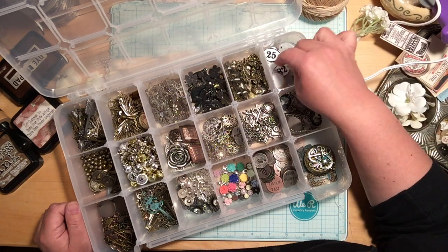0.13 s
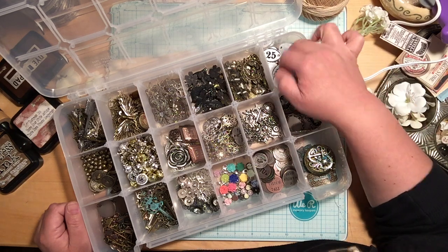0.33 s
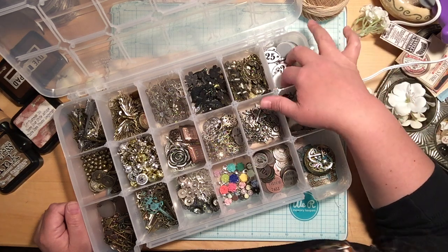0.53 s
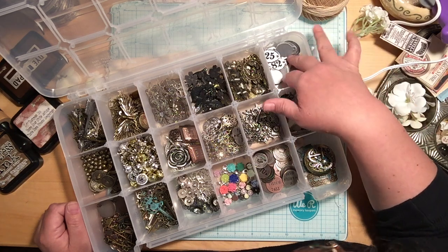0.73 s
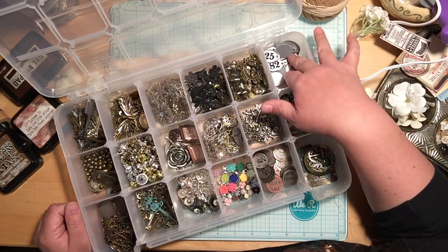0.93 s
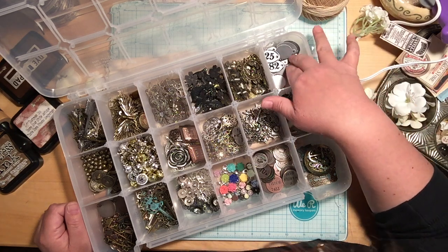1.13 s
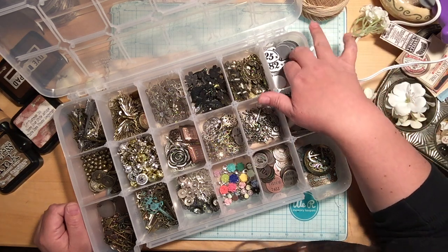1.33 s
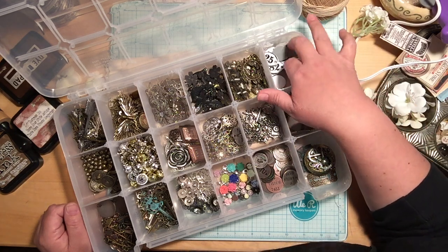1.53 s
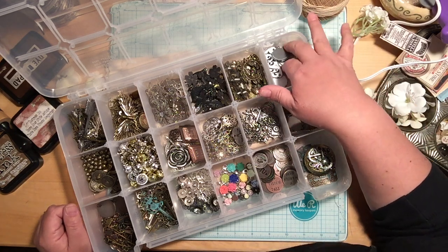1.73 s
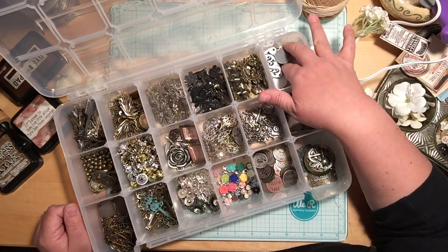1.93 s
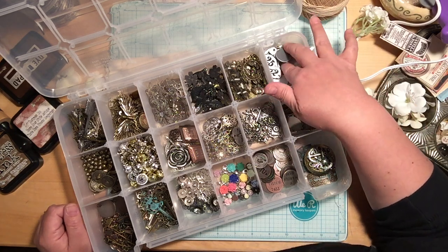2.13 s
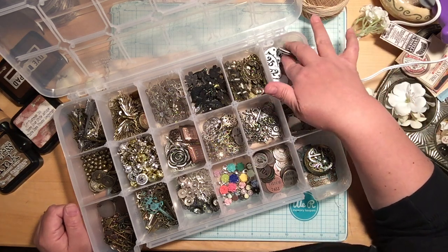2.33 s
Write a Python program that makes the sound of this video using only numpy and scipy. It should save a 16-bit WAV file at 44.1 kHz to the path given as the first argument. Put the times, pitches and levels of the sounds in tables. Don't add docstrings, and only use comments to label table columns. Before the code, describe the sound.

Metal tags rattle under a finger in a plastic compartment, loud at first, then lightly ticking

```python
import sys
import numpy as np
from scipy import signal
from scipy.fft import rfft, irfft, next_fast_len
from scipy.io import wavfile
from scipy.ndimage import map_coordinates

SR = 44100
rng = np.random.default_rng(int(sys.argv[2]) if len(sys.argv) > 2 else 0)


def voltage_ratio(decibels):
    exponent = np.asarray(decibels, float) / 20
    return 10 ** exponent


def master_out(mix):
    frames = np.transpose(np.atleast_2d(mix))
    ceiling = np.clip(frames, -1, 1)
    pcm = np.round(ceiling * 32767).astype(np.int16)
    wavfile.write(sys.argv[1], SR, pcm)


N = 105531

TAG_PARTIALS = [11960, 12085, 12770, 13245, 13640, 14970, 15495]
# (frequency [Hz], level [dB], T60 [s])
TRAY_MODES = [(678, -10.5, 0.052), (1010, -5, 0.051), (1104, 1, 0.027), (1280, 3, 0.016),
              (1489, 5.5, 0.019)]


def contacts(clack, tick):
    # (time [s], clack peak level [dB],
    # tray knock level re clack [dB], metal tick level re clack [dB])
    tag_contacts = [(0.0893, -44.5, 10, -31), (0.1351, 0, -10.5, -18), (0.156, -18.5, -35, 4),
                    (0.163, -7.5, -11, 4), (0.1689, -13, -8, 4.5), (0.1738, -10, -7, -2.5),
                    (0.187, -12, -39, 1.5), (0.1967, -17, -10, -4), (0.2041, -13, -17, 6.5),
                    (0.2257, -23.5, -6.0, 6), (0.2411, -19.5, -21, 4.5), (0.258, -25, 3, 8),
                    (0.3426, -30, -6.5, 2), (0.402, -46, 8.5, -22), (0.498, -14, -30, -8.5),
                    (0.5031, -10, -16, -3), (0.5283, -14, -5, -2), (0.5695, -21, -13, -14.5),
                    (0.5869, -32.5, -16, 16), (0.5946, -15.5, -24, -9.5), (0.602, -20.5, -32, -1.5),
                    (0.638, -21.5, -13, -5), (0.6854, -22, -13.5, 0), (0.7176, -39, 3.5, 10.5),
                    (0.781, -51, 0, 7),
                    (0.821, -29.5, -11, -35), (0.845, -34.5, -9, -14.5), (0.9243, -42, -9, -24),
              (0.9745, -42, -23, -24), (1.0846, -20.5, -4.5, -30), (1.104, -26.5, 0.5, -28),
              (1.131, -32.5, -12, -19), (1.2804, -20, -13, -3.5), (1.3207, -43.5, -23.5, 20.5),
              (1.424, -23, -7.5, -4), (1.4412, -27, -7, -8), (1.462, -20.5, -3, -21),
              (1.506, -25, -7.5, -15), (1.5667, -59, -11, 18), (1.5819, -16, -22, 0.5),
              (1.6357, -25, -21, 4.5),
                    (1.6685, -35, -26, -10), (1.683, -26, -22, -23), (1.705, -34, 3, -12),
               (1.7181, -18.5, -15, -13), (1.74, -23, -8, 3.5), (1.7501, -23.5, -8, 4.5),
               (1.769, -29, -12, 1.5), (1.7853, -22.5, -12.5, -21), (1.8186, -24.5, -7.5, -5),
               (1.8459, -50, 3, 10), (1.8602, -25, -14, -11), (1.8777, -35.5, -0.5, 19.5),
               (1.927, -42.5, -6.0, 11), (1.961, -50.5, -6.0, 22.5), (1.9777, -34.5, 7, 8.5),
               (2.0032, -30.5, 2, -10), (2.017, -36, -10, -6), (2.0297, -33, -3, -14),
               (2.142, -55, -9, 5.5), (2.219, -42, -0.5, 7.5), (2.348, -37.5, 0.5, -8),
               (2.3633, -30, -17, 1.5),
                    (0.1918, -32, -16, -2), (0.21, -14.5, -10, 2), (0.235, -16.5, -3.5, -10),
               (0.2695, -30, 0, -5), (0.3011, -38, -10, -6), (0.5145, -30, -6, -8), (0.5635, -27, -7, -8),
               (0.945, -39.5, -11, -14.5), (1.014, -54.5, 13.5, -20), (1.1155, -33, -4.5, -12.5),
               (1.3052, -35.5, -10, -1.5), (1.345, -48, -2, -10), (1.3667, -40, -12, -15),
               (1.375, -40.5, -10, -15), (1.436, -37.5, 6, -10), (1.4525, -41, -10, 7),
               (1.4755, -30, -6, -11), (1.627, -29.5, -25, -4.5), (1.6999, -36, -18, -8),
               (1.7273, -32, 1.5, 4), (1.836, -50, -15, 0), (1.865, -29, 1.5, -8), (1.8943, -40, -4, 14),
               (1.9013, -41.5, -20, 15.5), (1.914, -43, -11, 12), (2.241, -46, -3.5, 12),
               (2.275, -47.5, 0.5, -16), (2.354, -36, -0.5, -8), (2.375, -42.5, 2, -14)]
    contact_s, detune = 0.0026, 0.1

    times, clack_db, knock_db, tick_db = np.transpose(tag_contacts)
    clacks = strike(times, clack_db, clack, contact_s, detune)
    tray_knocks = strike(times, clack_db + knock_db, TRAY_MODES, contact_s, 0.5 * detune)
    ticks = strike(times, clack_db + tick_db, tick, 0.5 * contact_s)
    return clacks + tray_knocks + ticks


def strike(times, db, modes, contact_s, detune=0):
    length = 2048
    first_click, mode_spread_db = 7, 3.0
    t = np.arange(length) / SR

    chatter = rng.standard_normal((len(times), length)) ** 3
    chatter = chatter * np.minimum(t / 0.0005, 1) * np.exp(-t / contact_s)
    chatter[:, 0] = first_click

    strengths = rng.standard_normal((len(times), len(modes)))
    sounds = 0
    for k, (hz, level, t60) in enumerate(modes):
        gain = voltage_ratio(level + mode_spread_db * strengths[:, k, None])
        sounds = sounds + gain * ring(chatter, hz, t60)

    if detune:
        grip = np.tanh(rng.standard_normal((len(times), 1)))
        read = (1 + detune * grip) * np.arange(length)
        sounds = map_coordinates(sounds, [np.indices(read.shape)[0], read], order=3)

    peaks = np.abs(sounds).max(axis=1)
    sounds = sounds * (voltage_ratio(db) / peaks)[:, None]
    out = np.zeros(N + length)
    starts = (times * SR).astype(int)
    np.add.at(out, starts[:, None] + np.arange(length), sounds)
    return out[:N]


def ring(drive, hz, t60):
    radius = voltage_ratio(-60 / (t60 * SR))
    angle = 2 * np.pi * np.minimum(hz, 0.45 * SR) / SR
    feedback = [1, -2 * radius * np.cos(angle), radius * radius]
    return signal.lfilter([0, np.sin(angle)], feedback, drive + 1e-18)


def spread_modes(colour, t60, count):
    hz = np.geomspace(colour[0][0], colour[-1][0], count) * rng.uniform(0.94, 1.03, count)
    ratio = hz / hz[0]
    level = at_hz(colour, hz) + 5 * np.log10(ratio)
    return list(zip(hz, level, t60 * ratio ** -0.3))


def at_hz(points, hz):
    known_hz, known_db = np.transpose(points)
    return np.interp(np.log(hz), np.log(known_hz), known_db)


def rings():
    # (time [s], level [dB], free ring time [s])
    free_tags = [
        [(.225, -23.5, 0.3), (.529, -30, 0.064), (1.212, -58.5, 0.09), (1.425, -58.5, 0.12),
         (1.462, -50, 0.088), (1.728, -47, 0.25), (1.822, -49, .08)],
        [(.168, -18.5, 0.11), (.6, -35.5, 0.22), (.843, -56.5, 0.065)],
        [(.163, -17, 0.075), (1.425, -43, 0.16), (1.82, -37.5, 0.086), (2.018, -62.5, 0.27)],
        [(.165, -26.5, .07), (1.74, -19, 0.033), (.188, -13, 0.11), (1.1, -29, 0.053)],
        [(.168, -30, 0.039), (.19, -23.5, 0.061), (.227, -24, 0.28), (.529, -20, 0.035)],
        [(0.24, -54, .3), (0.53, -22, 0.11), (2, -70, 0.32), (1.425, -49, 0.14), (2.6, -53, 0.16)],
        [(.19, -29.5, 0.11), (.212, -21.5, 0.092), (.638, -25, 0.065), (.528, -23, .05), (1.751, -51, .08),
         (0.243, -23.5, .1), (1.822, -52, 0.17)],
    ]
    twin_hz = 38
    out = np.zeros(N)
    for hz, strikes in zip(TAG_PARTIALS, free_tags):
        flutter = wander()
        for start, db, t60 in strikes:
            age = np.maximum(np.arange(N) / SR - start, 0)
            main = np.sin(2 * np.pi * hz * age + 1.7 * flutter)
            twin = 0.54 * np.sin(2 * np.pi * (hz - twin_hz) * age - 1.58 * flutter)
            decay = voltage_ratio(db - 20 * age / t60 * (2 + 10 * age / t60))
            onset = 1 - np.exp(-age / 0.00098)
            out += decay * onset * (main + twin) * voltage_ratio(2.9 * flutter)
    return out


def wander():
    every = 900
    count = N // every + 2
    return rms_one(np.interp(np.arange(N) / every, np.arange(count), rng.standard_normal(count)))


def rms_one(x):
    return x / np.sqrt(np.mean(x ** 2) + 1e-20)


def sliding(clack, tick):
    # (time [s], length [s], level [dB], brightness [dB])
    strokes = [(0.088, 0.2, -45.5, -19.5), (0.151, .11, -36, 0.5), (0.26, 0.26, -57, -20),
               (0.496, 0.036, -36, 1.5), (0.555, 0.066, -41.5, -8.5), (0.676, 0.051, -52.5, -1.5),
               (0.8, 0.047, -64, -1.5), (0.915, 0.064, -63.5, -6.5), (0.997, 0.066, -65, -20),
               (1.108, 0.019, -49.5, -16), (1.274, 0.13, -64, -7), (1.42, 0.062, -44, -10.5),
               (1.492, 0.17, -56, -7), (1.661, 0.14, -46, -8.5), (1.827, 0.07, -56, 2),
               (1.939, 0.089, -60.5, 2.5), (2.214, 0.067, -65.5, 1), (2.33, 0.17, -56.5, 3)]
    slips_per_s, slip_spread_db, patchy_db = 2200, 3.5, 4.0
    attack_s, release_db_per_s = 0.004, 900
    knock_db, keen_db = -1.5, 3.0

    sizes = voltage_ratio(slip_spread_db * np.minimum(rng.exponential(1, N), 4))
    happens = rng.random(N) < slips_per_s * voltage_ratio(patchy_db * wander()) / SR
    slips = sizes * happens

    def crackle(modes):
        total = 0
        for hz, db, t60 in modes:
            strength = voltage_ratio(db + patchy_db * np.tanh(wander()))
            total = total + ring(strength * slips * rng.standard_normal(N), hz, t60)
        return rms_one(total)

    dull = crackle([mode for mode in clack if mode[0] < 3400])
    tray = crackle(TRAY_MODES)
    keen = crackle([mode for mode in clack if mode[0] >= 3400])
    metal = crackle(tick)

    start, length, db, bright_db = np.transpose(strokes)[:, :, None]
    age = np.arange(N) / SR - start
    attack = np.clip(age / attack_s, 0, 1)
    level = attack * voltage_ratio(db - release_db_per_s * np.maximum(age - length, 0))
    bright_level = level * voltage_ratio(bright_db)
    low = level.sum(axis=0) * (dull + voltage_ratio(knock_db) * tray)
    high = bright_level.sum(axis=0) * (voltage_ratio(keen_db) * keen + metal)
    return low + high


def knocks():
    # (time [s], frequency [Hz], level [dB], ring time [s], 60 dB down at half of it)
    clean_knocks = [(0.0, 609, -37, 0.051), (0.046, 288, -43.5, 0.26), (.07, 148, -39, 0.16),
                    (0.104, 204, -39.5, 0.12), (1.543, 153, -43, 0.1), (2.004, 1592, -26, 0.036),
                    (0.1354, 899.5, -7, 0.052), (0.135, 1043, 1, 0.033), (.1623, 3440, -10, 0.022),
                    (0.161, 2610, -13, 0.056), (.168, 1308, -16.5, 0.058), (.165, 638, -29.5, 0.1),
                    (0.188, 2555, -30, .06), (0.5033, 3080, -14, 0.024), (1.01, 1300, -58, 0.26),
                    (1.215, 930, -54, 0.17), (1.488, 2630, -47, .1), (1.583, 1330, -31, 0.084),
                    (1.584, 2955, -26, 0.043), (1.707, 1150, -30.5, 0.048), (1.8196, 921, -37.5, 0.13),
                    (2.347, 1126, -26, 0.026), (2.217, 3000, -52.5, .1)]
    out = np.zeros(N)
    for start, hz, db, t60 in clean_knocks:
        age = np.maximum(np.arange(N) / SR - start, 0)
        decay = voltage_ratio(db - 20 * age / t60 * (2 + 8 * age / t60))
        onset = 1 - np.exp(-age * hz / 2)
        out += decay * onset * np.sin(2 * np.pi * hz * age)
    return out


def room(x):
    t60_s, wall_cut_hz = 0.19, 1200
    size = next_fast_len(N + SR)
    hz = np.fft.rfftfreq(size, 1 / SR)
    total = 0
    for k, lag in enumerate(rng.uniform(0.011, 0.032, 10)):
        wall = voltage_ratio(-60 * lag / t60_s) / (1 + 1j * hz / wall_cut_hz)
        loop = wall * np.exp(-2j * np.pi * hz * lag)
        total = total + (-1) ** k * loop / (1 - loop)
    return irfft(rfft(x, size) * total, size)[:N]


def air():
    # (frequency [Hz], level [dB])
    air_colour = [(35, -39), (60, 1), (200, -5), (300, -11), (460, -20.5), (1300, -17.5), (5000, -27.5),
                  (15000, -44.5)]
    # (frequency [Hz], width [Hz], level [dB])
    hum_lines = [(74, 8, -62), (222, 7, -59), (245, 40, -66)]
    air_db = -62
    hz = np.maximum(np.fft.rfftfreq(N + 1, 1 / SR), 10)
    spectrum = rfft(rng.standard_normal(N + 1)) * voltage_ratio(at_hz(air_colour, hz))
    out = voltage_ratio(air_db) * rms_one(irfft(spectrum, N + 1)[:N])
    for hum_hz, width, db in hum_lines:
        hum = ring(rng.standard_normal(2 * N), hum_hz, 2.2 / width)[N:]
        out = out + voltage_ratio(db) * rms_one(hum)
    return out


def scene():
    # (frequency [Hz], level [dB])
    clack_colour = [(1600, -30.5), (2600, 6), (4200, 5), (6300, 4.5), (8000, -26.5), (10500, -19.5)]
    # (frequency [Hz], level [dB], T60 [s])
    wall_modes = [(2059, -4, 0.11), (2630, 3.5, 0.026)]
    # (frequency [Hz], level [dB])
    tick_colour = [(6500, -3), (10300, -7), (12000, -10), (13200, -2), (14400, -4), (15600, 4.5)]
    ping_db, ping_t60_s = -11.0, 0.045
    tray_cut_hz, room_db = 520, -20.5

    clack = spread_modes(clack_colour, 0.016, count=20) + wall_modes
    ping_hz = [*TAG_PARTIALS, *rng.uniform(11400, 15700, size=9)]
    pings = [(hz, ping_db, ping_t60_s) for hz in ping_hz]
    tick = spread_modes(tick_colour, 0.007, count=24) + pings

    tags = contacts(clack, tick) + rings() + sliding(clack, tick)
    no_bass = signal.butter(4, tray_cut_hz, "high", fs=SR, output="sos")
    box = signal.sosfilt(no_bass, tags) + knocks()
    return (box + voltage_ratio(room_db) * room(box) + air())[None]


def band_limit(x):
    return signal.sosfilt(signal.butter(12, 16990, fs=SR, output="sos"), x)


def record(dry):
    top, cutoff_hz = 1.3, 15950
    rounded = top * np.tanh(dry / top)
    low_pass = signal.cheby2(14, 40, cutoff_hz, fs=SR, output="sos")
    mix = signal.sosfilt(low_pass, rounded)
    return band_limit(mix)


dry = scene()
out = record(dry)
master_out(out)
```